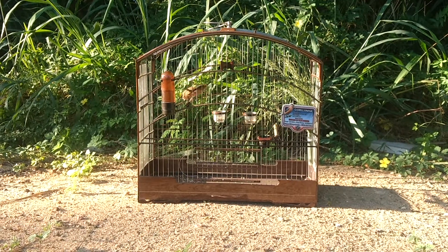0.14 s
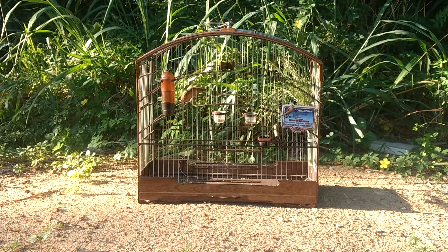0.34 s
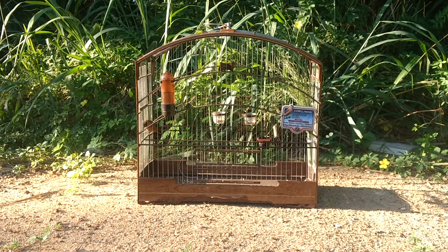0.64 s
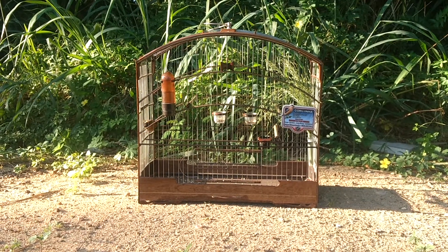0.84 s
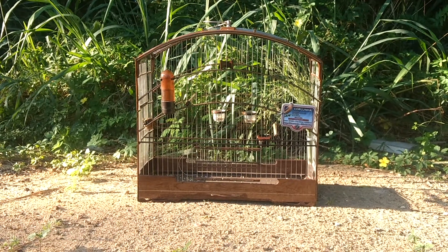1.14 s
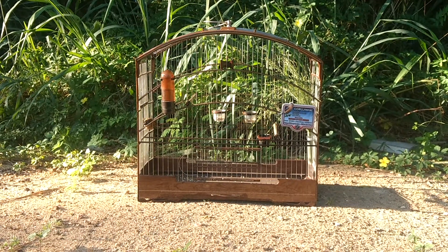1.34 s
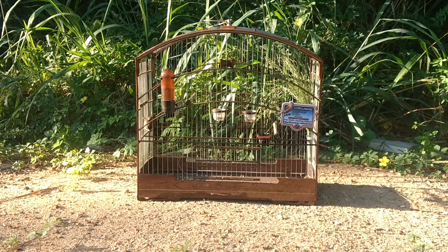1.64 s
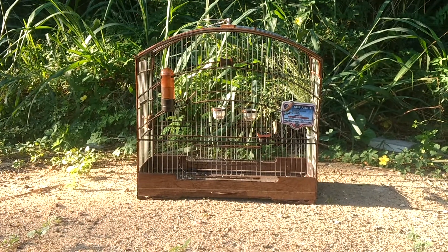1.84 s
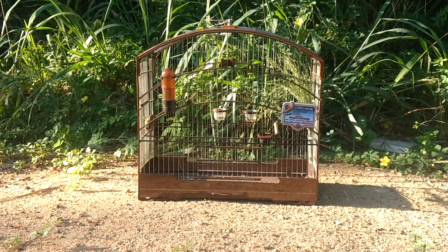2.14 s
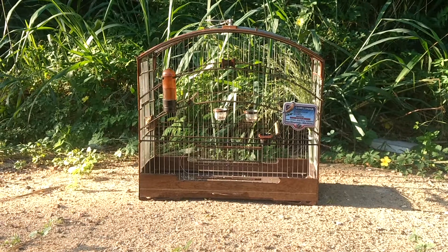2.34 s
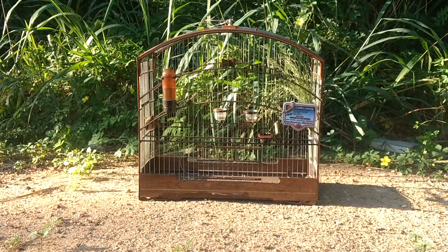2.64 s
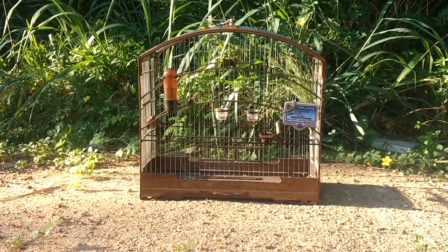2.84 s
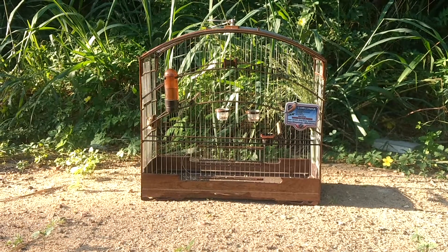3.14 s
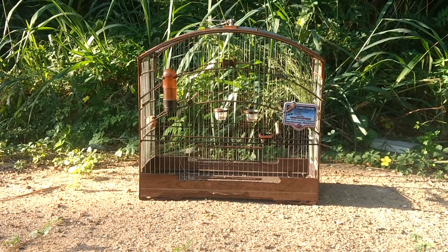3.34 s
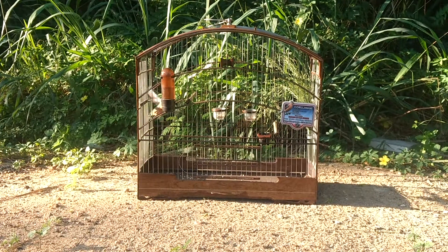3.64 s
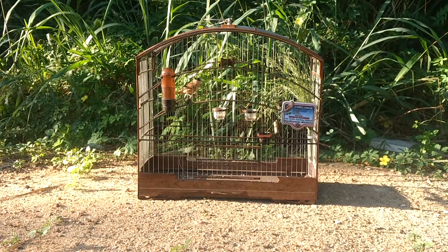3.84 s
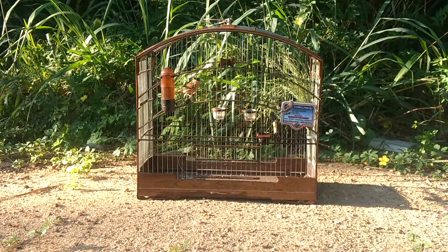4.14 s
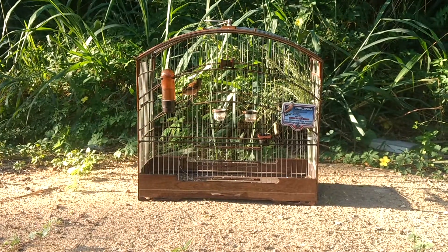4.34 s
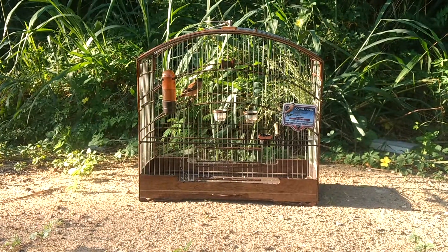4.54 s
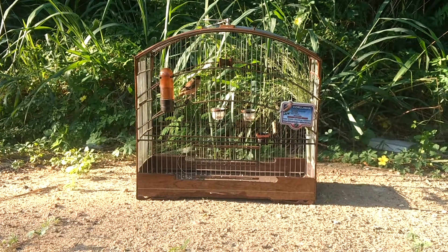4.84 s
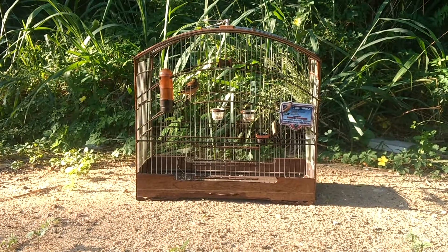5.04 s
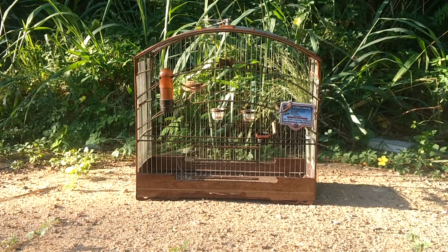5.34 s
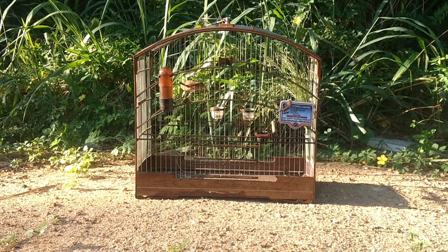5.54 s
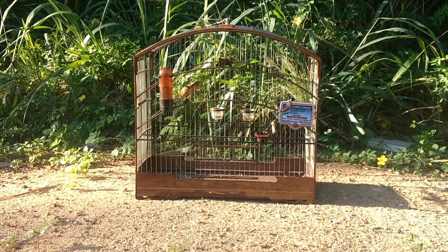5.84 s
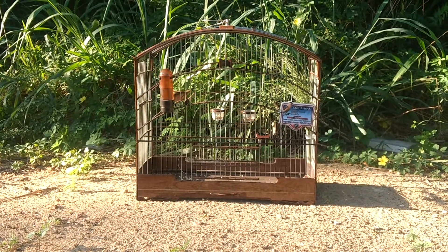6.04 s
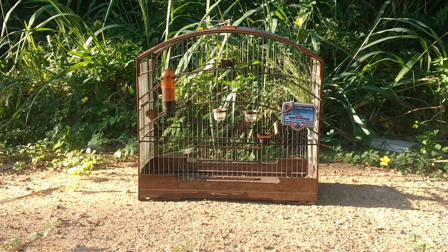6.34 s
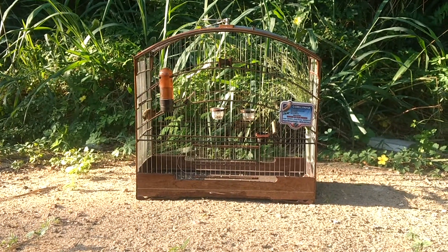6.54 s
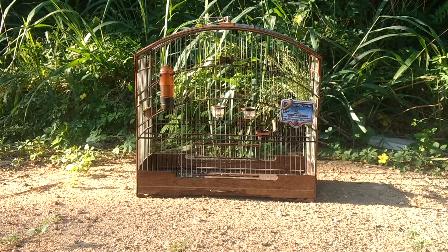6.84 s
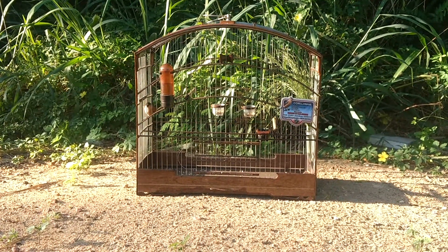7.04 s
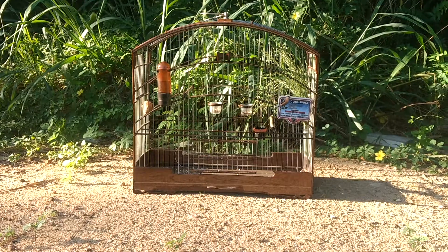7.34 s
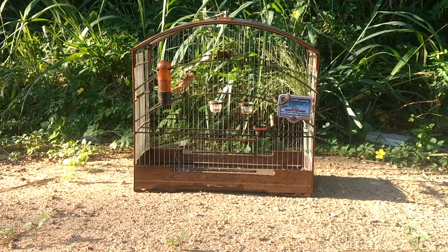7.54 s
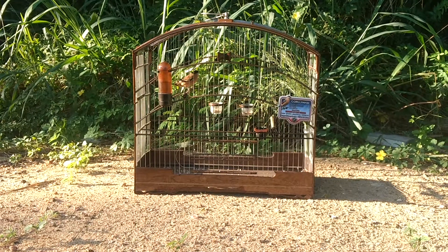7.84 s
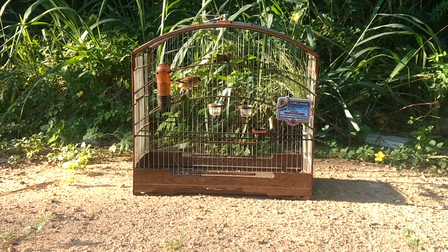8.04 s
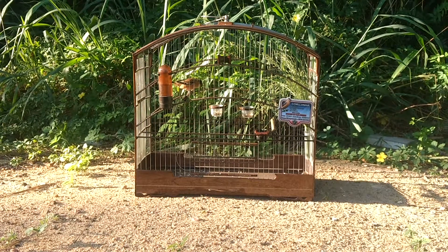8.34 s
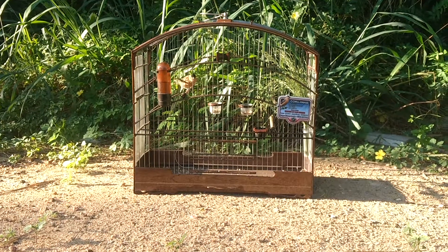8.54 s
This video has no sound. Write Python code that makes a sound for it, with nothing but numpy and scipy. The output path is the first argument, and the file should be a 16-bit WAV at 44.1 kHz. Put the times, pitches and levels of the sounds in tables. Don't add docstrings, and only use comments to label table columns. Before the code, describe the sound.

Outdoors beside a leafy thicket, steady far traffic rumble, low hum, leaf noise and thin insect hiss lie under distant birds that whistle, tick and trill. A caged bird gives a few quick notes early, one loud, pure downward whistle about halfway, then buzzes and a run of sharp, very loud notes near the end. Cage and bushes add short echoes. The microphone stands nearby, with a wide low-frequency background.

```python
import sys
import numpy as np
from scipy import signal
from scipy.fft import rfft, irfft, next_fast_len
from scipy.io import wavfile
from scipy.ndimage import uniform_filter1d, map_coordinates

SR = 44100
rng = np.random.default_rng(int(sys.argv[2]) if len(sys.argv) > 2 else 0)


def inscribe(sig):
    pcm = np.round(np.clip(np.atleast_2d(sig).T, -1, 1) * 32767)
    wavfile.write(sys.argv[1], SR, pcm.astype(np.int16))


def invert_db(x):
    u = np.asarray(x, float) / 20
    return 10 ** u


N = 383669
TOP_HZ = 15600

# turn at share of length, bend power, start and end off the turning pitch
# as share of the span, start in dB, loudest at share of length, end in dB.
SLUR = (1, 1, 1, 0, -7, .55, -5)
HELD = (1, 1.5, 1, 0, -2, .2, -11)
HOOK = (.32, 1.8, .24, 1, -9, .45, -11)
NOSE = (.58, 3, .4, 1, -6, .55, -8)


def unit(x):
    return x / np.sqrt(np.mean(x ** 2) + 1e-20)


def along(points, hz):
    point_hz, value = np.transpose(points)
    return np.interp(np.log(hz + 1), np.log(point_hz + 1), value)


def over_time(points):
    return np.interp(np.arange(N) / SR, *np.transpose(points))


def wobble(rate_hz):
    knots = rng.standard_normal(int(N * rate_hz / SR) + 4)
    return map_coordinates(knots, [np.arange(N) * rate_hz / SR])


def filtered(x, response):
    m = next_fast_len(N + SR // 2)
    return irfft(rfft(x, m) * response(np.fft.rfftfreq(m, 1 / SR)), m)[..., :N]


def rush(gain, patchy_db):
    # frequency in Hz, correlation.
    alike = [(40, .55), (160, .66), (250, .55), (500, .68), (1000, .96), (1600, .85), (2500, .97),
             (3300, .998)]
    z = signal.stft(rng.standard_normal((2, N)), nperseg=512)[2]
    field = uniform_filter1d(rng.standard_normal(z.shape[1:]), size=6, axis=0)
    field = uniform_filter1d(field, size=14, axis=1)
    pair = signal.istft(z * invert_db(patchy_db * unit(field)), nperseg=512)[1][:, :N]

    def mid_side(hz):
        angle = np.arccos(np.clip(along(alike, hz), -1, 1)) / 2
        return gain(hz) * np.array([np.cos(angle), np.sin(angle)])
    mid, side = filtered(pair, mid_side)
    return unit(np.array([mid + side, mid - side]))


def shaped(rows, shape):
    turn, power, before, after, start_db, loudest, end_db = shape
    u = np.linspace(0, 1, num=17)
    turn, loudest = np.clip([turn, loudest], .05, [1, .95])
    approach = before * (abs(turn - u) / turn) ** power
    leave = after * (abs(u - turn) / (1.001 - turn)) ** power
    off = np.where(u < turn, approach, leave)
    swell_db = np.interp(u, [0, loudest, 1], [start_db, 0, end_db])
    return [np.transpose([s + u * length, hz + (far_hz - hz) * off, db + swell_db])
            for s, length, hz, far_hz, db in rows]


def whistles(notes, overtones_db, flutter_db, jitter, hoarse, warble_hz=0, warble_depth=0):
    out = np.zeros(N + SR)
    shake_db, drift = flutter_db * wobble(140), jitter * wobble(220)
    breath = hoarse * (wobble(900) + 1j * wobble(900))
    for note in notes:
        s, hz, db = np.transpose(note)
        at = np.arange(round(s[0] * SR), min(round(s[-1] * SR), N))
        t = at / SR
        cycle = (t - s[0]) * warble_hz % 1
        pitch = uniform_filter1d(np.interp(t, s, hz), size=150)
        pitch = pitch * (1 + drift[at] + warble_depth * (2 * cycle - 1))
        phase = 2 * np.pi * np.cumsum(pitch) / SR
        ramp = np.clip(np.minimum(t - s[0], s[-1] - t) / .003, 0, 1)
        gain = invert_db(np.interp(t, s, db) + shake_db[at]) * ramp
        if warble_hz:
            gain = gain * np.sin(np.pi * cycle) ** 0.48
        total = 0
        for k, partial_db in enumerate([0, *overtones_db], 1):
            partial = np.imag((1 + k * k * breath[at]) * np.exp(1j * k * phase))
            total = total + invert_db(partial_db) * partial * (k * pitch < TOP_HZ)
        out[at] += np.sqrt(2) * gain * total
    return out[:N]


def traffic_and_leaves():
    # frequency in Hz, level in dB per Hz.
    air = [(25, -107), (45, -86), (80, -69), (110, -66), (155, -61), (210, -65), (320, -70), (500, -76),
           (900, -81), (1500, -81), (2600, -88), (3600, -94.5), (7000, -100.3), (15500, -115.3)]
    # time in s, level in dB.
    traffic = [(0, -41.5), (.41, -44), (1.26, -42), (4.14, -42), (4.4, -43), (6.59, -41), (7.2, -41),
               (8.7, -40.5)]

    def low(hz):
        return 1 / (1 + (hz / 600) ** 4)
    rumble = rush(lambda hz: invert_db(along(air, hz)) * np.sqrt(low(hz)), patchy_db=0.5)
    rumble *= invert_db(over_time(traffic) + 0.5 + 0.38 * wobble(2.914))
    leaves = rush(lambda hz: invert_db(along(air, hz)) * np.sqrt(1 - low(hz)), patchy_db=0.7)
    hz = np.arange(TOP_HZ)
    leaves_power = np.sum(invert_db(2 * along(air, hz)) * (1 - low(hz)))
    leaves *= np.sqrt(leaves_power) * invert_db(1.13 + 0.31 * wobble(6))
    return rumble + leaves


def drones():
    # centre in Hz, width in Hz, level in dB.
    hum = [(158.3, 7.8, -50.5), (314.5, 3.5, -56), (85, 13, -61), (854, 23, -65.5), (9440, 44, -82.5),
           (14000, 14, -88)]

    def lines(hz):
        return sum(invert_db(db) / np.sqrt(w) / (1 + (2 * (hz - c) / w) ** 2) for c, w, db in hum)
    return invert_db(1.5) * np.sqrt(sum(invert_db(2 * db) for c, w, db in hum)) * rush(lines, patchy_db=0.6)


def insects():
    chorus = rush(lambda hz: np.exp(-.5 * ((hz - 5330) / 240) ** 2), patchy_db=2.4)
    return chorus * invert_db(-50.0 + 0.9 * wobble(35))


def road():
    # time in s, level in dB.
    tyres = [(0, -49), (1.2, -95), (3.5, -56), (6.3, -56.5), (7.1, -51.5), (8.0, -47.5), (8.7, -53.5)]
    hiss = rush(lambda hz: np.exp(-.5 * (np.log2((hz + 1) / 2300) / .5) ** 2), patchy_db=-1.5)
    return invert_db(over_time(tyres)) * hiss


def far_whistles():
    bow = (.66, 1.9, 1, .68, -1, .6, -2)
    arch = (.5, 2.6, 1, .34, -5, .4, -3)
    droop = (.42, 2.4, .6, 1, -3, .6, -2)
    # start in s, length in s, turning pitch in Hz, farthest pitch in Hz, level in dB.
    slurs = [(.003, .027, 3350, 3500, -48), (2.343, .024, 3980, 5300, -51), (2.4, .03, 3960, 4260, -58),
             (5.35, .015, 4200, 4560, -54), (6.26, .05, 3660, 3530, -45), (7.81, .055, 5600, 6440, -54),
             (7.9, .022, 6150, 5750, -54), (7.925, .017, 4050, 4000, -52), (8.19, .02, 1800, 2080, -48),
             (8.35, .025, 4100, 4000, -60), (8.43, .015, 1650, 1655, -49), (8.55, .145, 4020, 3850, -60),
             (8.585, .02, 3300, 3530, -56), (8.588, .014, 5800, 5810, -45)]
    held = [
        (.001, .04, 1900, 2750, -37),
        (.05, .035, 2500, 3000, -45),
    ]
    arches = [(.245, 0.13, 4540, 4300, -65), (2.365, 0.044, 4300, 4020, -60),
              (2.41, .172, 2704, 2350, -46.5), (7.65, .065, 3410, 2660, -51),
              (7.72, 0.091, 4260, 3890, -50.5), (8.53, 0.17, 2040, 1850, -48)]
    droops = [
        (.87, 0.1, 4520, 4260, -65),
        (6.0, 0.029, 6000, 5720, -50),
        (8.35, 0.039, 2050, 1870, -44),
    ]
    hooks = [
        (2.22, .062, 3430, 2300, -42),
    ]
    bows = [
        (4.24, .495, 3470, 2045, -51),
        (4.32, .38, 2286, 1760, -46.5),
    ]
    rough_arches = [
        (.16, .23, 3020, 2270, -50.5),
    ]
    rough_droops = [
        (1.46, .12, 2680, 2460, -49),
        (1.85, .115, 2940, 2440, -56),
        (1.94, .03, 2820, 2440, -48),
    ]
    rough_slurs = [
        (6.585, .04, 4550, 4400, -59),
        (6.73, .06, 4470, 4780, -58),
        (7.6, .12, 1950, 1945, -51),
    ]
    # time in s, pitch in Hz, level in dB.
    stepped = [
        (7.665, 2100, -46),
        (7.7, 2450, -38),
        (7.71, 2700, -34.5),
        (7.76, 2800, -38.5),
        (7.797, 2805, -46),
        (7.803, 2550, -41.5),
        (7.85, 2430, -44.5),
        (7.885, 2050, -51),
    ]
    clean = shaped(slurs, SLUR) + shaped(arches, arch) + shaped(bows, bow)
    clean += shaped(droops, droop) + shaped(hooks, HOOK) + shaped(held, HELD) + [stepped]
    rough = shaped(rough_slurs, SLUR) + shaped(rough_arches, arch) + shaped(rough_droops, droop)
    far = whistles(clean, overtones_db=[-21], flutter_db=0.1, jitter=0.0032, hoarse=0.095)
    return far + whistles(rough, overtones_db=[], flutter_db=2.5, jitter=.01, hoarse=.27)


def ticks():
    # centre in s, start in Hz, end in Hz, level in dB.
    stray = [(.072, 3600, 3100, -52), (.24, 4600, 4100, -52.5), (.51, 4400, 4100, -61),
             (1.065, 4500, 3500, -55), (3.81, 3300, 2800, -52), (3.862, 3200, 2900, -53),
             (4.03, 7300, 6900, -61), (4.155, 3300, 3000, -52), (5.672, 4700, 4400, -57.5),
             (6.105, 4300, 4100, -57), (6.155, 4300, 3900, -55), (6.953, 4500, 4500, -48),
             (7.29, 4350, 4300, -42), (8.335, 6000, 6600, -49), (8.34, 4400, 4400, -53)]
    # centre in s, level in dB.
    tick_rows = [(.238, -55.5), (.605, -56.5), (.845, -57), (1.135, -59.5), (1.425, -57), (1.465, -54),
                 (1.74, -60), (1.845, -52.5), (2.338, -53.5), (3.075, -54), (3.418, -50.5)]
    # first chip in s, chip count, period in s, loudest in dB.
    trills = [
        (4.845, 5, .054, -55),
        (5.195, 9, .0453, -48),
        (7.878, 12, .0467, -54.5),
    ]
    # start in Hz, end in Hz.
    trill_hz = [(3700, 3000), (3700, 2900), (4300, 2300)]
    chips = [(s, 6900, 5900, db, 9) for s, db in tick_rows]  # s, start Hz, end Hz, dB, length ms
    chips += [(*row, 12) for row in stray]
    for (first, count, period, db), hz in zip(trills, trill_hz):
        for k in range(count):
            swell_db = -5 * abs(2 * k / (count - 1) - 1)
            chips.append((first + k * period, *hz, db + swell_db, 13))
    notes = []
    for s, a, b, db, ms in chips:
        half_s = ms / 2000
        notes.append([(s - half_s, a, db + 4), (s, (a + b) / 2, db), (s + half_s, b, db - 4)])
    return whistles(notes, overtones_db=[-30], flutter_db=2.5, jitter=0.0035, hoarse=0.81)


def caged_song():
    warble = (1, 1.6, 1, 0, -8, .7, -3)
    flick = (.22, 1.4, .75, 1, -11, .45, -4)
    settle = (1, 2.8, 1, 0, -16, .62, -2)
    dip = (.55, 3, 1, .44, -6, .6, -5)
    # start in s, length in s, turning pitch in Hz, farthest pitch in Hz, level in dB.
    buzzes = [
        (.198, 0.083, 2616, 2390, -43),
        (6.45, 0.12, 2980, 2755, -37.5),
        (6.728, .117, 2954, 2810, -36),
    ]
    slurs = [
        (.361, .026, 7300, 5650, -34),
        (.372, .016, 5600, 6400, -36),
        (6.94, .02, 5450, 5700, -45),
        (7.392, .026, 5250, 4960, -33.5),
        (7.412, .012, 6200, 5300, -32),
    ]
    held = [
        (.386, .086, 5690, 5600, -34.5),
        (.478, .105, 5680, 5700, -46),
        (6.9, .025, 3970, 3930, -45),
        (7.468, .02, 4320, 4340, -32),
    ]
    nasal = [
        (3.94, .072, 1590, 1100, -53.5),
        (7.228, .074, 1640, 1245, -55),
    ]
    flicks = [
        (5.858, .037, 8000, 7350, -46),
        (7.25, .048, 3070, 2620, -33),
        (7.497, .073, 3460, 2120, -35),
    ]
    settles = [
        (5.87, .035, 6720, 5900, -43),
        (6.572, .056, 3940, 3500, -35),
        (6.855, .046, 3950, 3500, -36),
        (7.098, .078, 6250, 7750, -27),
        (7.345, .07, 6820, 7500, -34),
    ]
    hooks = [
        (6.963, .04, 5150, 4900, -22),
        (7.205, .04, 4370, 3600, -29.5),
        (7.447, .018, 4380, 4150, -20.5),
    ]
    noses = [
        (6.999, .038, 5070, 4520, -23.5),
    ]
    dips = [
        (7.417, .03, 4560, 5970, -27.5),
    ]
    song = shaped(slurs, SLUR) + shaped(settles, settle) + shaped(held, HELD) + shaped(hooks, HOOK)
    song += shaped(flicks, flick) + shaped(dips, dip) + shaped(noses, NOSE)
    near = whistles(song, overtones_db=[-34, -48], flutter_db=2, jitter=.006, hoarse=.14)
    near += whistles(shaped(nasal, NOSE), overtones_db=[17, 0, 0], flutter_db=2.5, jitter=.012, hoarse=.07)
    near += whistles(shaped(buzzes, warble), overtones_db=[-30], flutter_db=-1.0, jitter=0.0165,
                     hoarse=0.35, warble_hz=114.6, warble_depth=0.069)
    return near


def feathers():
    # time in s, level in dB, length in ms.
    rustle = [
        (.38, -60, 30),
        (3.12, -66, 73),
        (3.98, -66, 29),
        (5.88, -61, 22),
        (7.0, -65, 40),
        (7.43, -56.5, 38),
    ]
    t = np.arange(N) / SR
    puffs = sum(invert_db(db) * np.exp(-.5 * ((t - s) * 1000 / ms) ** 2) for s, db, ms in rustle)
    bright = filtered(rng.standard_normal(N), lambda hz: 1 / (1 + (9000 / (hz + 1)) ** 4))
    return puffs * invert_db(3.3 * wobble(71)) * unit(bright)


def falling_whistle():
    # time in s, pitch in Hz, level in dB.
    glide = [
        [(4.305, 11600, -64), (4.315, 7900, -46), (4.333, 6620, -23), (4.35, 5970, -20.5), (4.373, 5720, -19),
         (4.41, 4890, -18), (4.46, 4390, -23.5), (4.54, 4030, -38), (4.565, 3600, -47)],
    ]
    return whistles(glide, overtones_db=[-32, -38], flutter_db=1.5, jitter=.004, hoarse=0.023)


def cage_echoes(x, share):
    # delay in ms, level in dB.
    cage = [(1.7, -24), (2.6, -24), (4.3, -18), (7.2, -3.5), (12.5, -4)]

    def response(hz):
        echoes = sum(invert_db(db) * np.exp(-2j * np.pi * hz * ms / 1000) for ms, db in cage)
        return 1 + share * echoes / (1 + (5100 / (hz + 1)) ** 12)
    return filtered(x, response)


def thicket(x):
    # frequency in Hz, t60 in s.
    decay = [(2000, 0.26), (4000, 0.35), (6000, 0.59), (9000, 0.56)]
    hz, t, z = signal.stft(rng.standard_normal(SR // 2), SR, nperseg=256)
    tail = signal.istft(z * invert_db(-60 * t / along(decay, hz)[:, None]), SR, nperseg=256)[1]
    return signal.fftconvolve(np.pad(x, (130, 0)), tail / np.linalg.norm(tail))[:N]


def birds():
    far = far_whistles() + ticks()
    near = caged_song()
    loud = falling_whistle()
    direct = cage_echoes(loud, share=0.67) + cage_echoes(near, share=0.16) + far + feathers()
    return direct + thicket(invert_db(-19.0) * loud + invert_db(-8.5) * near + invert_db(-5.5) * far)


def masked(x, below_db, octave_db, from_hz):
    hz, t, z = signal.stft(x, SR, nperseg=2048)
    power = uniform_filter1d(np.mean(abs(z) ** 2, axis=0), size=16, axis=0)
    band_db = 10 * np.log10(np.abs(power) + 1e-20)
    fade_db = octave_db * np.log2(hz + 1)[:, None]
    shadow_db = np.maximum.accumulate(band_db + fade_db, axis=0) - fade_db + below_db
    kept = (band_db > shadow_db) | (hz < from_hz)[:, None]
    return signal.istft(z * kept, SR, nperseg=2048)[1][:, :N]


def scene():
    return traffic_and_leaves() + drones() + insects() + road() + birds()


def low_pass(x):
    return signal.sosfilt(signal.butter(12, 15640, fs=SR, output="sos"), x)


def record(dry):
    # frequency in Hz, left minus right in dB.
    balance = [(80, 1), (150, 0.5), (230, 7), (400, 0.5), (700, 0), (1200, 0)]
    # frequency in Hz, right's lead in radians.
    right_lead = [(80, -1.4), (300, -1.3), (420, -1.3), (650, -2.05), (900, -2.9), (1300, -3.4),
                  (1750, -np.pi)]
    # frequency in Hz, gain in dB.
    capsule = [(6800, 0), (7500, -2.5), (15000, 1)]
    lag_s = 24.7 / SR

    def pair(hz):
        lean = invert_db(along(balance, hz) / 2)
        left = lean * np.exp(-2j * np.pi * hz * lag_s)
        right = np.exp(1j * along(right_lead, hz)) / lean
        return (hz < TOP_HZ) * invert_db(along(capsule, hz)) * np.array([left, right])
    heard = masked(filtered(dry, pair), below_db=-28, octave_db=22, from_hz=7100)
    return low_pass(heard)


dry = scene()
out = record(dry)
inscribe(out)
```